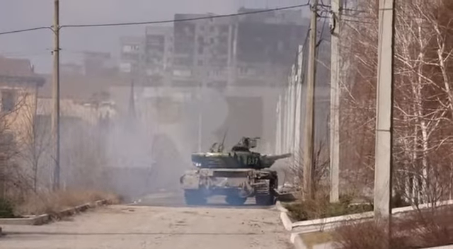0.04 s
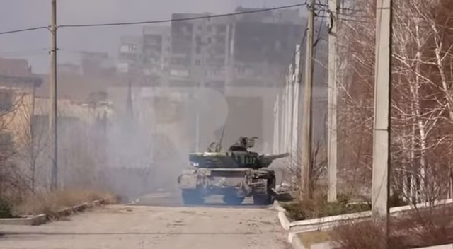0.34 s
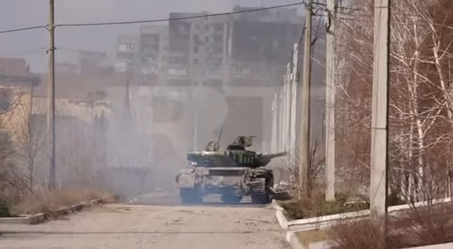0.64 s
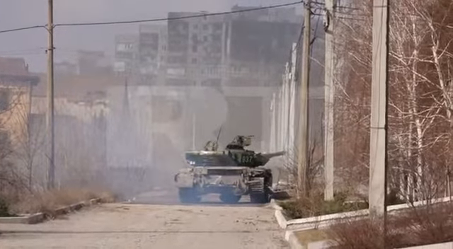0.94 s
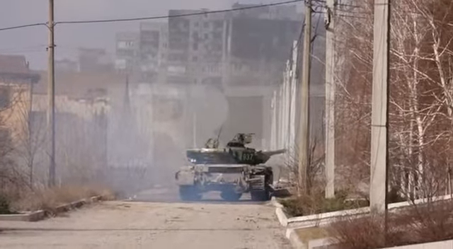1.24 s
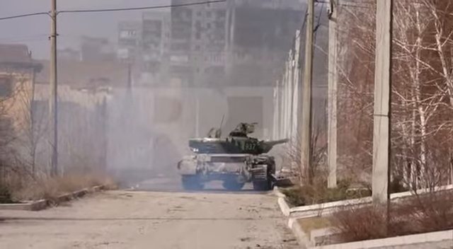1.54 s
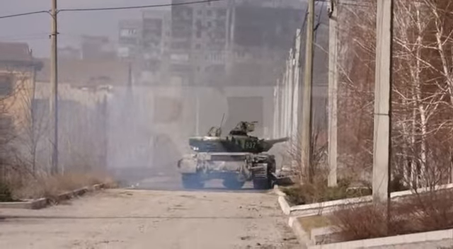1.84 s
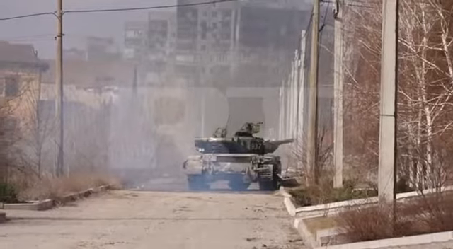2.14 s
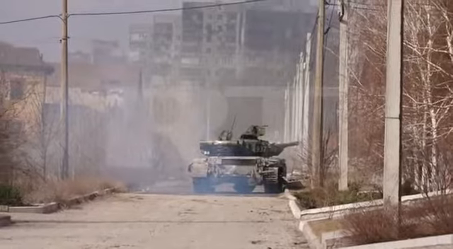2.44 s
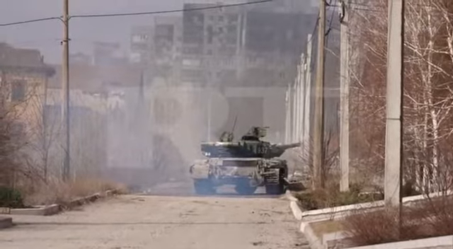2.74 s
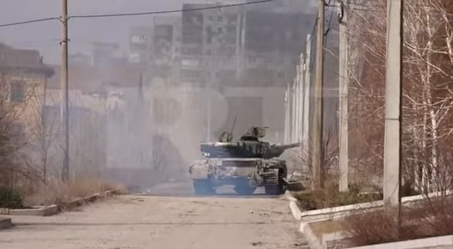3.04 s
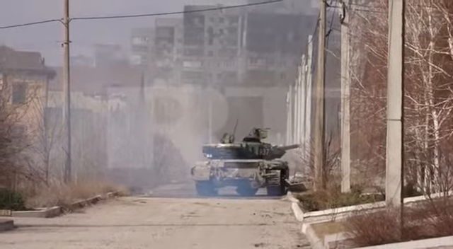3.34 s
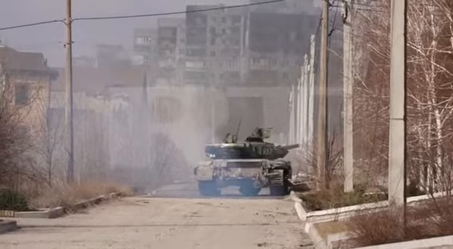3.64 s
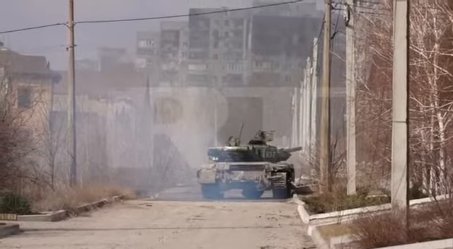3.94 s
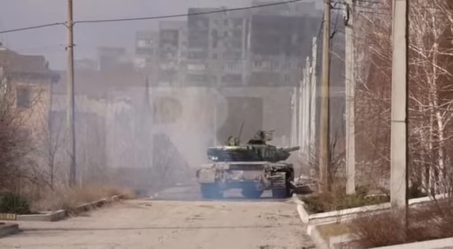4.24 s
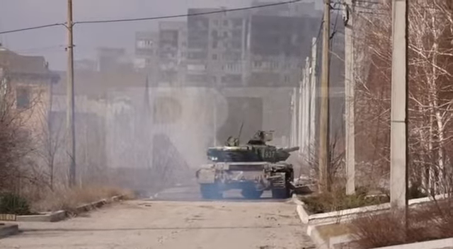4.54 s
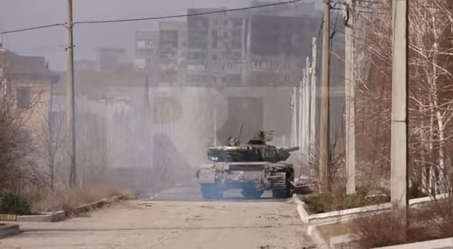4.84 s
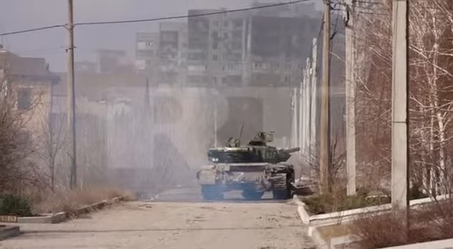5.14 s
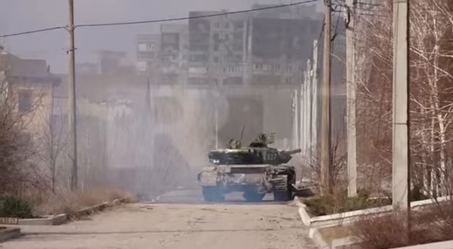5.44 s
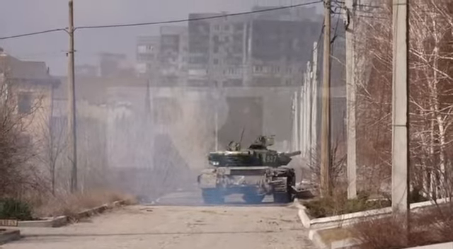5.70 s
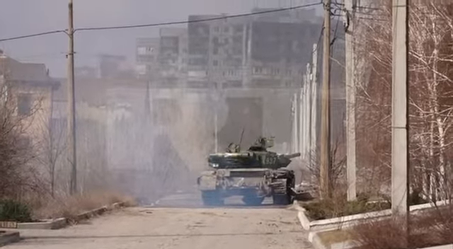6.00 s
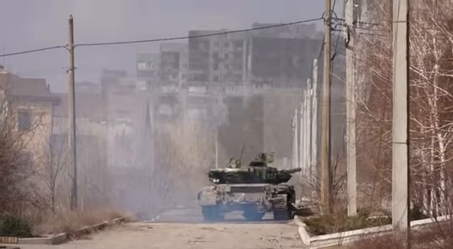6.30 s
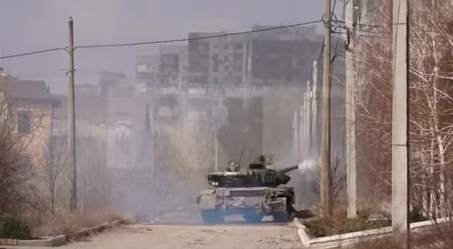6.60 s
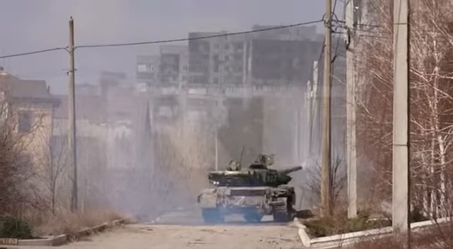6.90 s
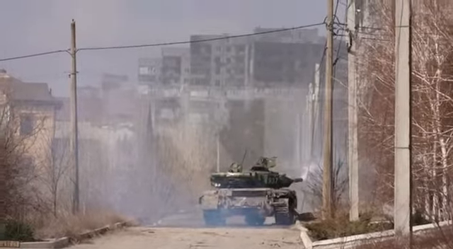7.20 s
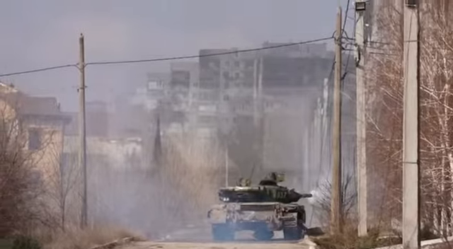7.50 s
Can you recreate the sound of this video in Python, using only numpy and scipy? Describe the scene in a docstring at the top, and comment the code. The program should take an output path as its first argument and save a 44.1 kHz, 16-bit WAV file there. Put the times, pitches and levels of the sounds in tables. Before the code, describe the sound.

A tank idles in a city street, its diesel engine giving a low, throbbing drone with light clatter and a thin metallic whine. Soft wind rumbles on the microphone, and a few dull knocks sound close by. After almost seven seconds the main gun fires one loud blast. Echoes from the houses merge into a rolling roar, and a sharp crack cuts through it near the end.

```python
"""A tank fires its main gun in a city street, after idling for almost seven seconds.
The blast is a shock front (a sudden jump in air pressure) that slaps back off the nearest walls.
Echoes between the houses merge into a long rolling roar, and a late sharp crack cuts through it.
Underneath, the diesel's exhaust drones, its gears and valves clatter and its steel whines thinly.
Light wind rumbles on the microphone, with a few dull knocks and faint ticks close by."""
import sys
import numpy as np
from scipy import signal
from scipy.fft import rfft, irfft, next_fast_len
from scipy.io import wavfile
from scipy.ndimage import uniform_filter1d, map_coordinates

SR = 44100
rng = np.random.default_rng(int(sys.argv[2]) if len(sys.argv) > 2 else 0)


def dump(signal):
    """Clip the signal to [-1, 1] and save it as 16-bit WAV at the path in sys.argv[1]."""
    limited = np.clip(np.atleast_2d(signal).T, -1, 1)
    pcm = np.round(limited * 32767).astype(np.int16)
    wavfile.write(sys.argv[1], SR, pcm)


N = 337806

# A colour says how strong the low and high parts of a sound are.
# The wind's colour. Each row: frequency in Hz, gain in dB.
WIND_COLOUR = [(15, -13), (30, -13), (55, 0), (85, 6), (130, 4), (200, -1.5), (320, -12), (500, -24.5),
               (1200, -68.5)]
# Gusts. Each row: middle in seconds, level in dB, half length in seconds.
GUSTS = [(.3, -30, 0.058), (.5, -33.5, .05), (1.68, -34, 0.023), (1.96, -32, 0.059), (3.47, -41, .03),
         (3.71, -35, 0.052), (4.93, -33.5, .025), (5.43, -33, 0.02), (5.75, -33.5, 0.02),
         (6.12, -36, 0.057), (6.27, -27.5, 0.039), (6.55, -28.5, 0.027), (6.69, -31.5, 0.035)]
# Dull knocks. Each row: start in seconds, peak in dB, brightness in Hz.
KNOCKS = [(0.334, -38, 400), (0.44, -46, 450), (0.474, -29, 199), (0.536, -25, 210), (1.99, -25.5, 260),
          (3.639, -27, 90), (3.71, -29.5, 90), (5.46, -34, 520), (5.736, -21, 250), (6.155, -16, 600),
          (6.245, -20, 480), (6.256, -22, 380), (6.263, -14, 480), (6.492, -23, 320), (6.509, -28, 400),
          (6.548, -22, 160)]
# The tones in a knock. Each row: pitch in Hz, strength in dB, seconds to fade by 60 dB.
KNOCK_TONES = [(130, -3, .04), (202, 2.5, 0.045), (331, 0, 0.034), (466, -2, 0.035), (810, -4.5, 0.025),
               (1280, -14.5, 0.038)]
# Faint ticks. Each row: start in seconds, strength in dB.
TICKS = [(2.349, -55), (4.771, -60), (5.353, -55.5)]
# Their colour. Each row: frequency in Hz, gain in dB.
TICK_COLOUR = [(3500, -34), (5800, 9), (7500, -4), (9000, -9)]

# Engine speed. Each row: time in seconds, cycles per second.
ENGINE_SPEED = [(2.8, 28.095), (3.4, 28.125)]
# Tones of the exhaust and the gears. Each row: multiple of the engine speed, strength in dB.
EXHAUST_TONES = [(1, -38.5), (2, -16.5), (3, -11.5), (4, -15), (5, -1), (6, -3.5), (7, 2.5), (8, -10),
                 (9, -13.5), (10, -18.5), (11, -31.5), (12, -21.5), (13, -22.5), (15, -52), (24, -100)]
GEAR_TONES = [(22, -11.5), (26, -11), (27, -11), (30, -11), (37, -14.5), (39, -9.5), (40, -15), (50, -10.5),
              (53, -13)]
# Colours of the engine's noises. Each row: frequency in Hz, gain in dB.
CASING_COLOUR = [(120, -21.5), (220, 6), (340, 4.5), (450, -1.5), (620, 1.5), (830, 0), (950, -11.5),
                 (1300, -27.5), (2500, -54.5)]
CLATTER_COLOUR = [(600, -33), (950, -1), (1080, 3), (1220, -0.5), (1450, 3.5), (1800, -6), (2300, -27.5),
                  (3500, -44.5)]
VALVE_COLOUR = [(1200, -23), (1900, -1.5), (2220, 2.5), (2500, -3), (3300, -6.5), (3850, -18.5),
                (5000, -42.5)]
HISS_COLOUR = [(3000, -22.5), (4200, 2.5), (5700, -1), (6600, 0.5), (7400, -8), (9000, -9)]
# Loudness of the casing. Each row: time in seconds, level in dB.
CASING_LEVEL = [(0.2, -46), (1.05, -49), (2.7, -49.5), (4.6, -49), (5.7, -46), (6.6, -46.5)]
# Drift of the clatter, as the air carries it, and of the treble; only the rise and fall counts.
# Each row: time in seconds, level in dB.
CLATTER_DRIFT = [(0.0, -58), (0.95, -59.5), (1.15, -56), (1.6, -52), (2.12, -54), (2.22, -58),
                 (3.25, -55.5), (3.9, -57), (4.48, -64), (5.0, -56.5), (6.1, -59.5), (6.6, -54.5)]
TREBLE_DRIFT = [(0.0, -70), (0.3, -76.5), (1.15, -78.5), (1.58, -74), (1.85, -80), (3.0, -79.5),
                (3.25, -72.5), (3.62, -80), (3.85, -76), (4.45, -87.5), (5.0, -78), (5.25, -78.5),
                (6.3, -77), (6.7, -72)]
# The engine's ringing steel. Each row: pitch in Hz, width in Hz, strength in dB.
STEEL_TONES = [(4365, 220, -2), (4544, 84, 2.5), (4795, 93, -4.5)]
# Squeals of the whistle, and brief, faint swells of narrow hiss near 3.3 kHz.
# Each row: middle in seconds, strength in dB, half length in seconds.
SQUEALS = [(.64, -64, .04), (1.15, -60, 0.053), (1.3, -61.5, 0.036), (1.62, -57.5, .06), (1.9, -64, 0.083),
           (2.68, -61, 0.046), (3.27, -64, .04), (3.97, -63, 0.13), (4.35, -61, .025), (5.43, -64.5, 0.027),
           (5.88, -56, .055), (6.18, -61, 0.073), (6.39, -59, 0.025), (6.58, -61, 0.12)]
HISS_SWELLS = [(1.56, -69, 0.098), (3.84, -65.5, 0.096), (5.02, -70, 0.13), (5.7, -67.5, .09)]

# Blocks of houses answer the shot in turn.
# Each row: arrival in seconds, hold in seconds, then levels of boom, roar and sizzle in dB.
HOUSE_ECHOES = [(6.784, 0.15, -13, -21, -37.5), (6.957, 0.038, -16, -22, -37.5),
                (6.989, 0.21, -15, -26, -48.5), (7.249, 0.033, -21, -26, -44.5),
                (7.337, 0.12, -16.5, -25.5, -50.5), (7.5, 0.038, -23.5, -27.5, -53),
                (7.595, 0.016, -24.5, -38.5, -73)]
# Colours of the echoes. Each row: frequency in Hz, gain in dB.
EARLY_BOOM_COLOUR = [(30, -40), (70, 0.0), (120, 1.5), (220, -10.5), (330, -13), (600, -52.0)]
DEEP_BOOM_COLOUR = [(12, -50), (20, -19), (61, 3.5), (87, 3.5), (113, 2.5), (195, -12.5), (297, -21),
                    (330, -18.5), (430, -52), (730, -120)]
ROAR_COLOUR = [(130, -29.5), (220, 1), (300, -1.5), (334, -7), (434, -10), (571, -3.5), (877, -9),
               (1050, -10), (1630, -8), (1950, -13.5), (2990, -18.5), (3500, -28), (3800, -27.5),
               (4940, -52), (8360, -120)]
SIZZLE_COLOUR = [(1880, -25), (3200, 1.5), (3560, -10.5), (4060, -4.5), (5730, -6), (8060, -14),
                 (9200, -23.5), (12000, -60), (20200, -120)]
# Hollow swells in the roar.
# Each row: middle in seconds, pitch in Hz, width in Hz, level in dB, half length in seconds.
HOLLOW_SWELLS = [(7.283, 866, 201, -29, 0.037), (7.41, 620, 90, -32.5, 0.093)]
# The snaps of the late crack. Each row: start in seconds, peak in dB.
SNAPS = [(7.519, -10), (7.5192, -3.5), (7.5207, -4), (7.5207, -4)]
# The tones in a snap. Each row: pitch in Hz, strength in dB, seconds to fade by 60 dB.
SNAP_TONES = [(450, -6, 0.0036), (950, 3.5, 0.0048), (1560, 6, 0.0058), (2220, 1.5, 0.014),
              (3960, -18, 0.005), (6100, -23, 0.0096)]
# Shock fronts, first the direct one, then those off single walls.
# Each row: arrival in seconds, strength in dB, length of the push in seconds.
SHOCK_FRONTS = [(6.7537, -1.5, 0.0022), (6.7599, -11, 0.0023), (6.7612, -11, 0.00083),
                (6.7643, -5.5, .0012), (6.774, -12.5, 0.0056), (6.7813, -10, 0.0022),
                (6.785, -8.5, 0.00053), (6.7897, -12, 0.0013), (6.8165, -19, 0.0036),
                (7.28, -18.5, 0.00034), (7.358, -14.5, 0.0029), (7.409, -12, 0.0051)]
# Colours of the shudder, the fronts and their splinters. Each row: frequency in Hz, gain in dB.
SHUDDER_COLOUR = [(50, -13), (160, 6), (300, -13), (800, -13), (2500, -29), (5000, -39), (9000, -60)]
FRONT_COLOUR = [(25, -23.5), (90, 4.5), (220, 3.0), (600, 1.0), (3000, -10), (9000, -23)]
SPLINTER_COLOUR = [(200, 7), (600, 2.5), (1600, 2.5), (2800, -2), (4200, -8), (6500, -14), (9000, -25)]

FIRE_S = 6.7533  # the shot arrives
TIME = np.arange(N) / SR


def amp(db):
    """Turn decibels into a gain to multiply by."""
    return 10 ** (np.asarray(db) / 20)


def unit(x):
    """Scale x to an average power of 1."""
    return x / np.sqrt(np.mean(x ** 2) + 1e-20)


def gain_at(colour, hz):
    """Read a colour's gain between its rows, on a log frequency scale."""
    row_hz, row_db = np.transpose(colour)
    return amp(np.interp(np.log(hz + 1), np.log(row_hz + 1), row_db))


def curve(rows):
    """Join (seconds, value) points with straight lines."""
    return np.interp(TIME, *np.transpose(rows))


def swing(rows):
    """How far a level curve lies above or below its average, in dB."""
    level_db = curve(rows)
    return level_db - level_db.mean()


def swells(rows):
    """A gain that rises and falls in one bell shape per row."""
    return sum(amp(db) * np.exp(-((TIME - s) / half_s) ** 2 / 2) for s, db, half_s in rows)


def wobble(rate):
    """A smooth curve through `rate` random values a second."""
    return map_coordinates(rng.standard_normal(int(N * rate / SR) + 4), [TIME * rate])


def filtered(x, response):
    """Multiply each frequency in x by response(hz)."""
    size = 2 * next_fast_len((N + SR) // 2)
    return irfft(rfft(x, size) * response(np.fft.rfftfreq(size, 1 / SR)))[:N]


def coloured(x, colour):
    """Give x a colour, with a filter that rings only after each sound."""
    def response(hz):
        cepstrum = irfft(np.log(gain_at(colour, hz)))
        return np.exp(rfft(2 * cepstrum[:len(hz) - 1], len(cepstrum)) - cepstrum[0])
    return filtered(x, response)


def noise(colour):
    """Coloured noise with a power of 1."""
    return unit(coloured(rng.standard_normal(N), colour))


def narrow_noise(hz, width_hz):
    """Noise close to one pitch, with a power of 1."""
    return unit(filtered(rng.standard_normal(N), lambda f: np.exp(-2 * ((f - hz) / width_hz) ** 2)))


def even(x, span_s):
    """Hold the power of x near 1 over every span."""
    size = int(span_s * SR) + 1
    power = uniform_filter1d(uniform_filter1d(x ** 2, size), size)
    return x / np.sqrt(np.abs(power) + 1e-12)


def add(track, s, sound):
    """Mix a sound into the track, starting at s seconds."""
    part = track[round(s * SR):][:len(sound)]
    part += sound[:len(part)]


def burst(db, fade_s):
    """A puff of noise that drops 60 dB in fade_s."""
    t = np.arange(SR // 10) / SR
    return amp(db - 60 * t / fade_s) * rng.standard_normal(len(t))


def ring(tones, bright_hz, contact_s):
    """A struck body rings, with a peak of 1; a soft blow weakens the tones above bright_hz."""
    t = np.arange(SR // 5) / SR
    sound = np.zeros(len(t))
    for hz, db, fade_s in tones:
        fade = amp(db + rng.normal(0, 2.8) - 60 * t / fade_s)
        sound += fade / (1 + (hz / bright_hz) ** 2) * np.sin(2 * np.pi * hz * t)
    sound *= 1 - np.exp(-(t / contact_s) ** 2)
    return sound / np.abs(sound).max()


def wind():
    """A fluttering breeze and soft gusts rumble on the microphone."""
    breeze = amp(-44.5 + 2 * wobble(9.9))
    return np.hypot(breeze, swells(GUSTS)) * even(noise(WIND_COLOUR), span_s=0.03)


def knocks_and_ticks():
    """Soft blows ring briefly as dull knocks; tiny bursts of noise tick."""
    knocks, ticks = np.zeros(N), np.zeros(N)
    for s, db, bright_hz in KNOCKS:
        add(knocks, s, amp(db) * ring(KNOCK_TONES, bright_hz, contact_s=0.0018))
    for s, db in TICKS:
        add(ticks, s, burst(db, fade_s=0.043))
    return knocks + coloured(ticks, TICK_COLOUR)


def throb(cycles):
    """One rise and fall per engine cycle."""
    return np.cos(2 * np.pi * (cycles - .3))


def whine(cycles, treble_db):
    """An unsteady whistle over ringing steel swells into squeals; it all shivers with each stroke."""
    def steel(hz):
        return sum(amp(db) * (1j * hz * width / (pitch ** 2 - hz ** 2 + 1j * hz * width)) ** 2
                   for pitch, width, db in STEEL_TONES)
    shiver = unit(amp(1.6 * throb(cycles) + 1.6 * wobble(14)))
    ringing = unit(filtered(rng.standard_normal(N), steel))
    whistle_hz = 4510 + 18 * wobble(55)
    whistle = np.sin(2 * np.pi * np.cumsum(whistle_hz) / SR)
    narrow_hiss = swells(HISS_SWELLS) * narrow_noise(hz=3320, width_hz=370)
    flicker = unit(amp(3.5 * wobble(16)))
    drift, squeal = amp(.35 * treble_db), swells(SQUEALS)
    whistle_gain = np.hypot(amp(-69.5) * drift, squeal) * flicker
    steel_gain = np.hypot(amp(-68.5) * drift, 0.43 * squeal)  # the steel takes up part of each squeal
    return shiver * (whistle_gain * whistle + steel_gain * ringing + narrow_hiss)


def rattle(cycles, colour, repeat_share, throb_db):
    """Throbbing machine noise: part is always new, part repeats each cycle and slowly changes."""
    patterns = rng.standard_normal((3, 1536))
    weights = np.array([wobble(1.188) for _ in patterns])
    loops = np.array([map_coordinates(p, [cycles % 1 * len(p)], mode="grid-wrap") for p in patterns])
    repeating = np.sum(weights * loops, axis=0) / np.linalg.norm(weights, axis=0)
    shaking = np.sqrt(repeat_share) * repeating + np.sqrt(1 - repeat_share) * rng.standard_normal(N)
    return unit(coloured(shaking * amp(throb_db * throb(cycles)), colour))


def gears(cycles):
    """Gears clatter and hum; each tone fades in and out on its own way through the moving air."""
    tones = sum(amp(db + 1.1 * wobble(2.5)) * np.sin(2 * np.pi * multiple * cycles + 0.75 * wobble(5))
                for multiple, db in GEAR_TONES)
    return tones + rattle(cycles, CLATTER_COLOUR, repeat_share=.35, throb_db=1.1)


def valves(cycles, treble_db, clatter_db):
    """Valves rattle, drifting with the treble and the clatter, and grow louder before the shot."""
    grow_from_s, grow_db_per_s = 5.63, 2.5
    growth_db = grow_db_per_s * (np.clip(TIME, grow_from_s, FIRE_S) - grow_from_s)
    level_db = -62 + 0.58 * treble_db + 0.19 * clatter_db + growth_db
    return amp(level_db) * rattle(cycles, VALVE_COLOUR, repeat_share=0.27, throb_db=0.5)


def exhaust(cycles, scatter_db=0.65, jitter_s=.00002, smear_s_per_hz=0.000198):
    """One uneven puff per cycle rings the exhaust pipe, which smears it into a throbbing drone."""
    starts = np.interp(np.arange(1, int(cycles[-1])), cycles, np.arange(N))
    timing, strength = rng.standard_normal((len(starts), 2)).T
    starts = np.clip(np.round(starts + jitter_s * SR * timing), 0, N - 1).astype(int)
    puffs = np.bincount(starts, amp(scatter_db * strength), N)
    cycle_hz = np.mean(np.array(ENGINE_SPEED)[:, 1])
    colour = [(multiple * cycle_hz, db) for multiple, db in EXHAUST_TONES]

    def pipe(hz):  # delays each tone by a different time
        return gain_at(colour, hz) * np.exp(-1j * np.pi * smear_s_per_hz * (hz - 7 * cycle_hz) ** 2)
    return unit(filtered(puffs, pipe))


def engine():
    """The idling diesel: all its noises keep time with the same turning shaft."""
    cycles = np.cumsum(curve(ENGINE_SPEED)) / SR  # cycles done so far
    clatter_db, treble_db = swing(CLATTER_DRIFT), swing(TREBLE_DRIFT)
    drone = amp(-34) * exhaust(cycles)
    casing_gain = amp(curve(CASING_LEVEL) + 0.26 * wobble(7.8))
    casing = casing_gain * rattle(cycles, CASING_COLOUR, repeat_share=.27, throb_db=0.4)
    clatter = amp(-56 + clatter_db) * gears(cycles)
    tapping = valves(cycles, treble_db, clatter_db)
    hiss = amp(-73 + treble_db) * rattle(cycles, HISS_COLOUR, repeat_share=0.032, throb_db=1.0)
    return drone + casing + clatter + tapping + hiss + whine(cycles, treble_db)


def echo_gains(rise_s=0.011):
    """Each block's echo swells, holds and dies away; their powers add up."""
    fall_db_per_s = np.array([[165], [79], [99]])  # boom, roar, sizzle
    power = np.zeros((3, N))
    for s, hold_s, *levels_db in HOUSE_ECHOES:
        age = np.maximum(TIME - s, 0)
        db = np.array(levels_db)[:, None] - fall_db_per_s * np.maximum(age - hold_s, 0)
        power += (np.minimum(age / rise_s, 1) * amp(db)) ** 2
    return np.sqrt(power)


def street_echoes(deepen_s=0.14):
    """Countless echoes merge into a rolling boom, a crackling roar and a faint sizzle."""
    boom_gain, roar_gain, sizzle_gain = echo_gains()
    depth = np.clip((TIME - FIRE_S) / deepen_s, 0, 1) ** 2  # the deepest part builds up last
    early, deep = noise(EARLY_BOOM_COLOUR), noise(DEEP_BOOM_COLOUR)
    boom = boom_gain * even(depth * deep + (1 - depth) * early, span_s=0.03)
    # echoes arrive in clumps, and every wall sends back its own range of pitches
    clumps = amp(1.6 * wobble(160) + 1.3 * wobble(900))
    spectra = signal.stft(clumps * rng.standard_normal(N), nperseg=1024)[2]
    walls = uniform_filter1d(rng.standard_normal(spectra.shape), size=4, axis=0)
    walls_db = 1.64 * unit(uniform_filter1d(walls, size=5, axis=1))
    echoes = signal.istft(spectra * amp(walls_db), nperseg=1024)[1][:N]
    roar = roar_gain * even(coloured(echoes, ROAR_COLOUR), span_s=0.058)
    sizzle = sizzle_gain * unit(coloured(clumps * rng.standard_normal(N), SIZZLE_COLOUR))
    hollows = sum(swells([(s, db, half_s)]) * even(narrow_noise(hz, width_hz), span_s=0.033)
                  for s, hz, width_hz, db, half_s in HOLLOW_SWELLS)
    return boom + roar + sizzle + hollows


def late_crack():
    """Four quick snaps make one sharp crack that cuts through the roar."""
    snaps = np.zeros(N)
    for s, db in SNAPS:
        add(snaps, s, amp(db) * ring(SNAP_TONES, bright_hz=7900, contact_s=.00008))
    return snaps


def shudder(start_s=6.728, end_s=6.777):
    """A low shudder starts just ahead of the shock and fades as the echoes crowd in."""
    gain = curve([(start_s, 0), (start_s + .002, 1), (FIRE_S, 1), (end_s, 0)])
    return amp(-27.5) * gain * noise(SHUDDER_COLOUR)


def gun_blast():
    """Each shock front is a steep push, then a longer suction; rough walls splinter it into noise."""
    direct_db, reflected_db, loss_db_per_s = -14, 2.5, 7  # splinters, relative to their front
    fronts, splinters = np.zeros(N), np.zeros(N)
    t = np.arange(SR // 10) / SR
    for k, (s, db, push_s) in enumerate(SHOCK_FRONTS):
        add(fronts, s, -amp(db) * (1 - t / push_s) * np.exp(-t / push_s))
        splinter_db = db + (reflected_db if k else direct_db) - loss_db_per_s * (s - FIRE_S)
        add(splinters, s, burst(splinter_db, fade_s=0.015))
    return coloured(fronts, FRONT_COLOUR) + coloured(splinters, SPLINTER_COLOUR)


def scene():
    """Engine, wind, knocks and the shot, mixed into one channel."""
    background = engine() + wind() + knocks_and_ticks()
    shot = shudder() + gun_blast() + street_echoes() + late_crack()
    return (background + shot)[None]


def record(dry):
    """Round off the highest peaks and cut the treble above top_hz."""
    ceiling, hardness, top_hz = .6, 6, 9250
    rounded = dry[0] / (1 + np.abs(dry[0] / ceiling) ** hardness) ** (1 / hardness)
    return filtered(rounded, lambda hz: 1 / (1 + (hz / top_hz) ** 120))[None]


dry = scene()
out = record(dry)
dump(out)
```